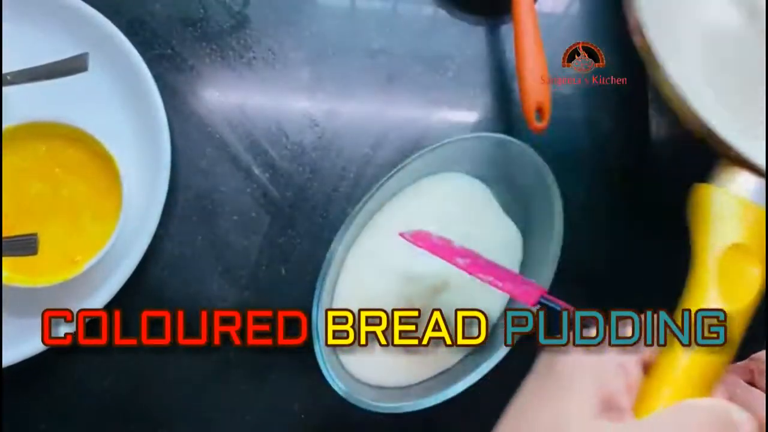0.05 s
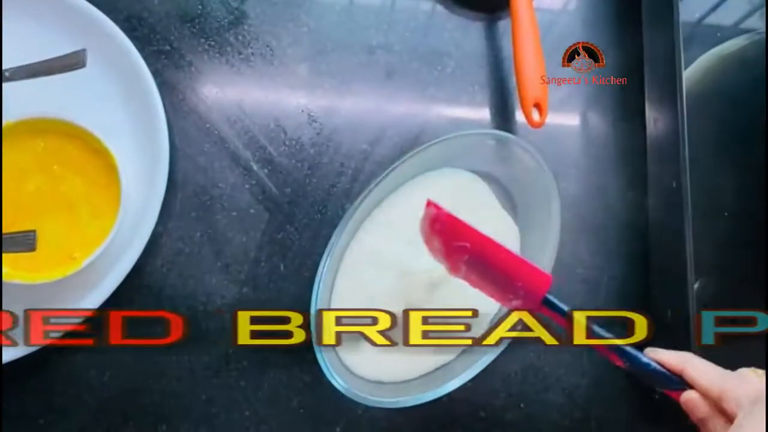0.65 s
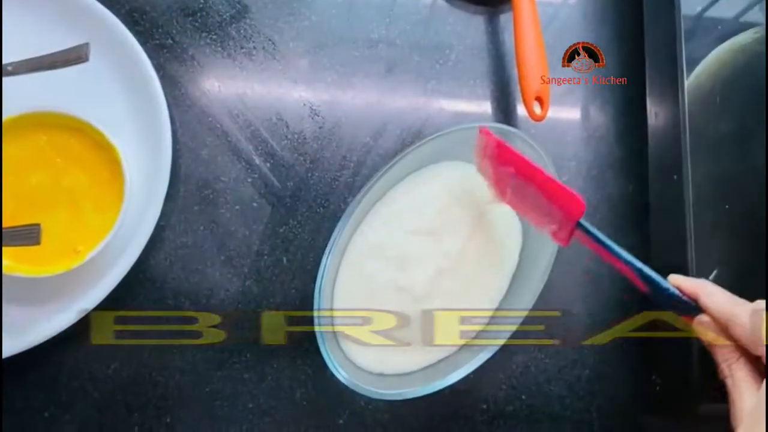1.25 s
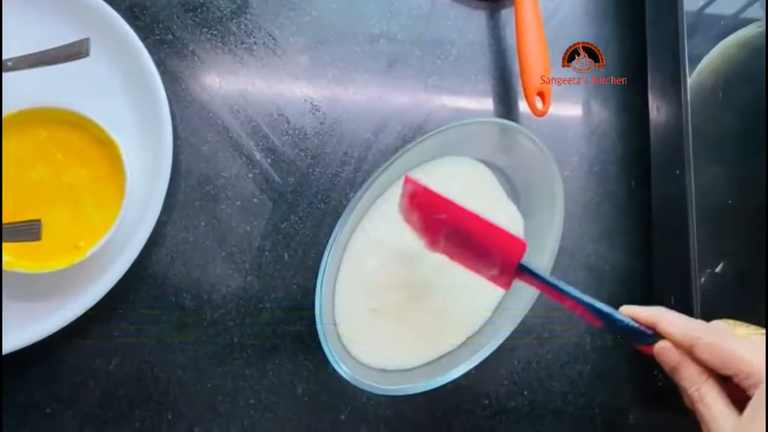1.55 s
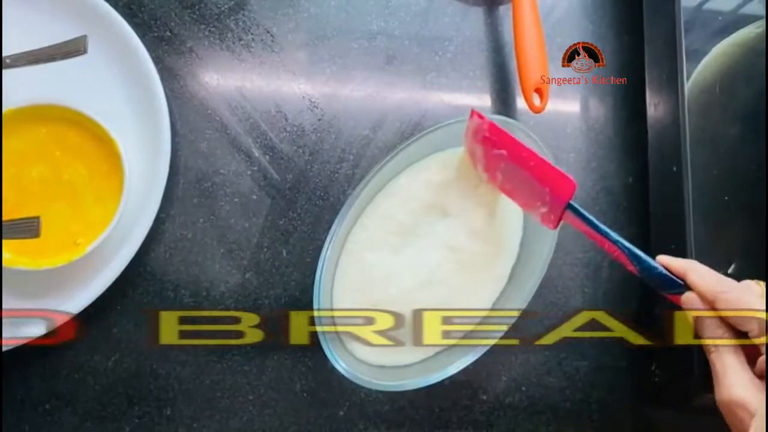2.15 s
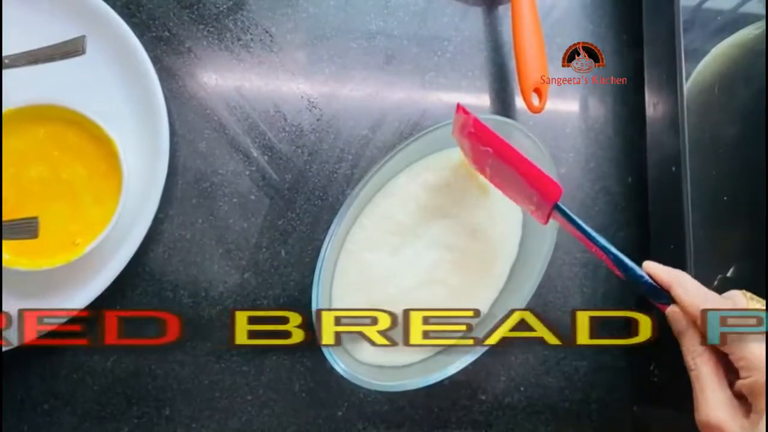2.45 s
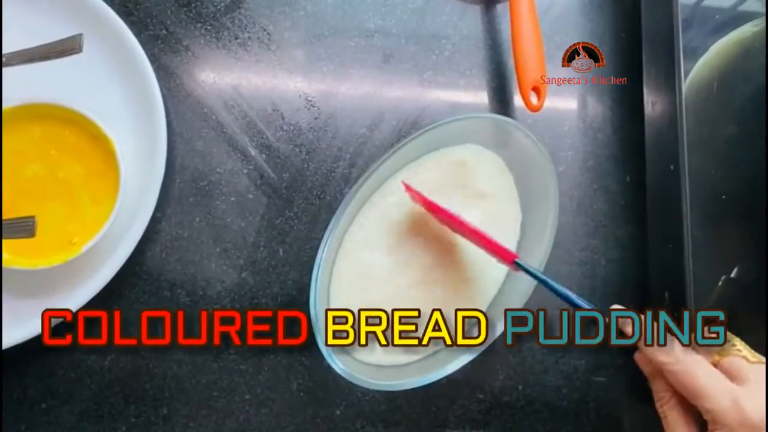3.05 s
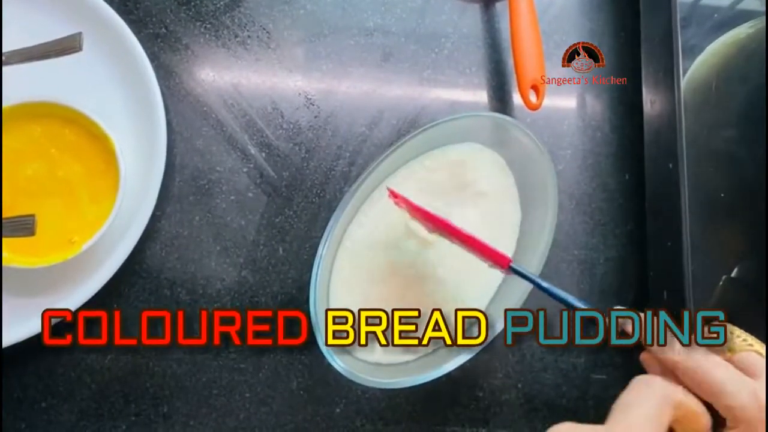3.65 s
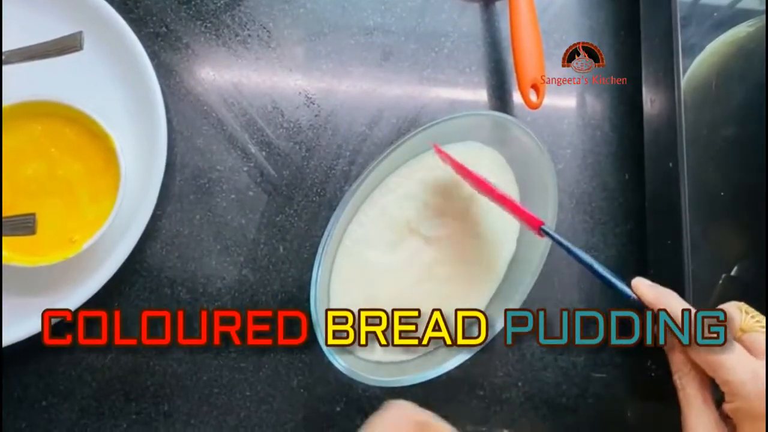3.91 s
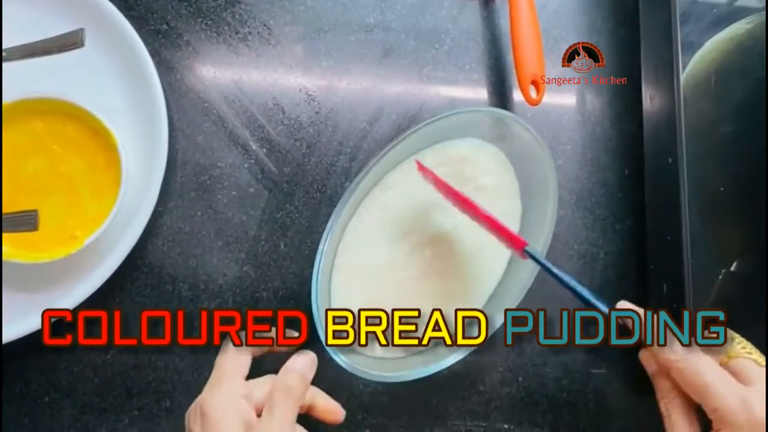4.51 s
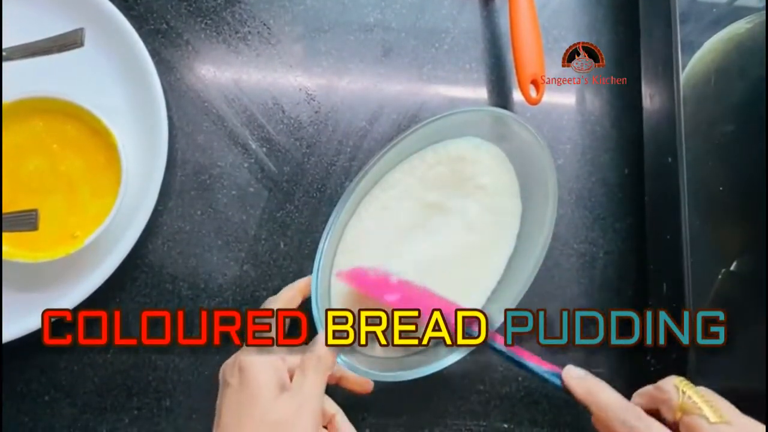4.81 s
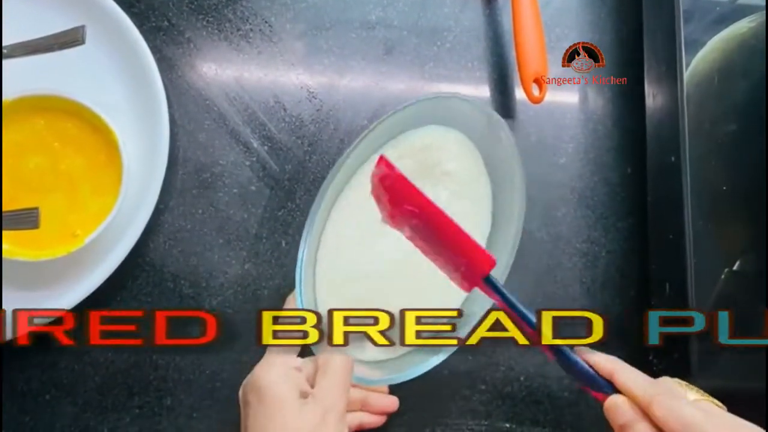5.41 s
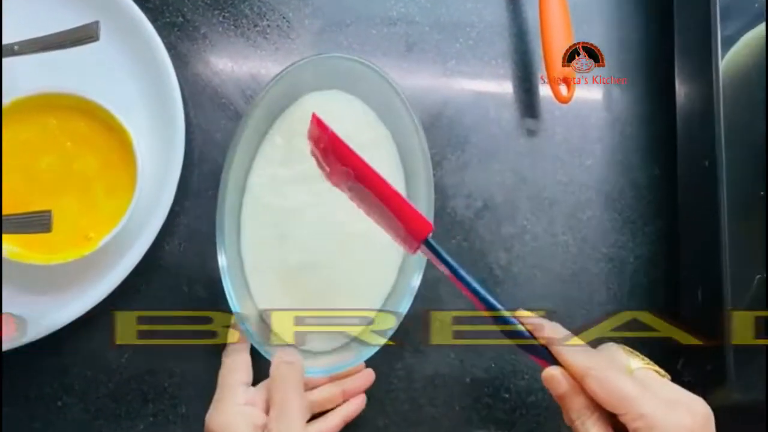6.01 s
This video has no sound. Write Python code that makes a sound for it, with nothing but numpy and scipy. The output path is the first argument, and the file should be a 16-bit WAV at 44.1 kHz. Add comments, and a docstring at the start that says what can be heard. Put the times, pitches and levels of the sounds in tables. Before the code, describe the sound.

Over a low kitchen hum, a pan knocks and rattles to rest, and a glass dish slides grittily and drops with a knock.

```python
"""Pan and custard dish in a small kitchen

Over a low machine hum, an emptied pan is knocked about and set down to one side: it clatters, thuds and
sings. A hiss surges briefly and a deeper drone stays on. A silicone spatula swishes almost silently
through custard in a glass baking dish. The dish is turned, sticks and slips over the worktop with a
gritty scrape and squeaks, drops back with a knock, and is ticked three times on the rim."""
import sys
import numpy as np
from scipy import signal
from scipy.fft import rfft, irfft
from scipy.io import wavfile
from scipy.ndimage import uniform_filter1d

SR = 44100
rng = np.random.default_rng(int(sys.argv[2]) if len(sys.argv) > 2 else 0)


def unload_wav(signal):
    """Save mono or channel-first audio to the path in sys.argv[1] as 16-bit WAV at rate SR, clipped to [-1, 1]."""
    wavfile.write(
        sys.argv[1],
        SR,
        np.round(np.clip(np.atleast_2d(signal).T, -1, 1) * 32767).astype(np.int16),
    )


N = 276507
TIME = np.arange(N) / SR
FREQS = np.fft.rfftfreq(N, 1 / SR)
BLOW_S = .75  # length of one blow's sound
BLOW_TIME = TIME[:int(BLOW_S * SR)]

# dull thud of the pan on its support: f/Hz, level/dB, t60/s
THUD_MODES = [(193, -6.5, 0.31), (246.2, -1, 0.21), (280.2, 5.5, 0.097), (346.4, -8.5, 0.11),
              (410.7, -5.5, 0.26), (461, -4.5, 0.1), (740, -11, 0.15)]
# the worktop's own boom: f/Hz, level/dB, t60/s
WORKTOP_MODES = [(76.2, -5.5, 0.6), (148.7, -12, 0.33), (237, -21, 0.79)]
# the pan's countless faint upper modes: f/Hz, level/dB
SHIMMER_COLOUR = [(1200, -7), (2000, 9), (2600, 9), (3200, 3), (3700, 1), (4400, -10), (6000, 11),
                  (8300, -21), (10200, 2), (12000, -18)]
# the filled glass dish, damped by the worktop: f/Hz, level/dB, t60/s
DISH_MODES = [(336, -12, 0.2), (661, -17, 0.23), (786, -6, 0.15), (881, -0.5, 0.15), (1160, -5, 0.2),
              (1270, -3.5, 0.11), (1364, -1.5, 0.17), (1510, -1.5, 0.2), (1540, 2, 0.07),
              (1730, -18, 0.097), (2070, -13, 0.06), (2350, -7.5, 0.08), (3380, -20, 0.055),
              (3920, -10, 0.082)]


def undb(db):
    """Decibels to gain."""
    return 10 ** (np.asarray(db) / 20)


def unit(x):
    """Scale to rms 1."""
    return x / np.sqrt(np.mean(x ** 2))


def across(points, hz=FREQS):
    """Read (f/Hz, value) points on a log-frequency axis."""
    f, value = np.transpose(points)
    return np.interp(np.log(np.maximum(hz, 1)), np.log(f), value)


def noise(gain):
    """Stereo noise of rms 1 with a gain per frequency; the bass is alike left and right."""
    # stereo width: f/Hz, side minus mid/dB
    width = [(40, -47), (100, -21.5), (160, -17.5), (280, -8.5), (500, 2), (1000, -0.5), (6000, -3.5),
             (10000, -0.5)]
    mid, side = rfft(rng.standard_normal((2, N))) * gain
    side = side * undb(across(width))
    return unit(irfft(np.array([mid + side, mid - side]), N))


def coloured(colour):
    """Stereo noise shaped by (f/Hz, level/dB) points."""
    return noise(undb(across(colour)))


def walk(rate_hz):
    """A smooth random wobble of rms 1."""
    step = int(SR / rate_hz)
    stairs = np.repeat(rng.standard_normal(N // step + 1), step)
    return unit(uniform_filter1d(stairs, step)[:N])


def swell(s, rise_s, hold_s, fall_s):
    """Gain that reaches 1 at time s, holds and dies away; it changes tenfold in rise_s and in fall_s."""
    return 10 ** -(np.maximum(s - TIME, 0) / rise_s + np.maximum(TIME - s - hold_s, 0) / fall_s)


def pushes(rows):
    """Bell-shaped gains of movements that speed up and slow down, from (t/s, length/s, level/dB) rows."""
    return sum(undb(db) * np.exp(-(2 * (TIME - s) / length) ** 2) for s, length, db in rows)


def ring(modes, detune=0.0094):
    """Decaying modes after one blow, each slightly detuned at random, fading smoothly to silence."""
    t, out = BLOW_TIME, 0
    for hz, db, t60 in modes:
        phase = 2 * np.pi * hz * (1 + detune * rng.standard_normal()) * t
        out = out + undb(db - 60 * t / t60) * np.sin(phase)
    return np.array([out, out]) * (1 - (t / BLOW_S) ** 4)


def burst(source, t60):
    """A short random stretch of noise that dies away: countless dense modes."""
    start = rng.integers(N - len(BLOW_TIME))
    return source[:, start:start + len(BLOW_TIME)] * undb(-60 * BLOW_TIME / t60)


def spread(x, rise_s):
    """Vibration takes a moment to fill the whole object."""
    return x * (1 - np.exp(-TIME[:x.shape[1]] / rise_s))


def soften(x, hz):
    """A softer contact loses its treble."""
    return signal.sosfilt(signal.butter(2, hz, fs=SR, output="sos"), x)


def add(track, s, sound):
    """Mix a sound in at time s."""
    start = int(s * SR)
    track[:, start:start + sound.shape[1]] += sound[:, :N - start]


def balance(x, left_db):
    """Make the left channel left_db louder than the right."""
    return x * undb(np.array([[1], [-1]]) * left_db / 2)


def place(x, lead_s):
    """Off to one side: the sound reaches the left channel lead_s sooner."""
    return irfft(rfft(x) * np.exp(1j * np.pi * FREQS * lead_s * np.array([[1], [-1]])), N)


def drone_on(full_s=3.45, rise_s=0.16):
    """Gain of the drone: it rises quickly and stays."""
    return 10 ** (np.minimum(TIME - full_s, 0) / rise_s)


def hum(hum_db=-55, drone_db=-47, waver_db=-0.31):
    """Steady machine hum and the later, deeper drone, both coloured by the same resonances."""
    # broad tone of the hum and of the drone: f/Hz, level/dB
    hum_colour = [(20, -32), (35, -4), (55, -4.5), (80, -6), (150, -1.5), (300, -2.5), (450, -14),
                  (700, -18.5), (1000, -24), (1300, -28), (1800, -38), (3000, -47.5), (7000, -46),
                  (14000, -88)]
    drone_colour = [(20, -25), (35, -2), (70, 0), (150, 2), (290, -0.5), (500, -12), (750, -17.5),
                    (1000, -19.5), (1400, -27), (1750, -36), (2600, -38.5), (4000, -46.5), (7000, -43.5),
                    (14000, -102)]
    # resonances that stand out of both: f/Hz, width/Hz, boost/dB
    resonances = [(47.4, 20, 11), (100.3, 5.2, 14.5), (144.6, 22.3, 12.5), (232.4, 28, 4), (284.6, 44, 6.5),
                  (330.8, 15, 6), (398.5, 17.7, 8), (488, 16.4, 10), (701, 56, 11)]
    peaks_db = sum(db / (1 + ((FREQS - hz) / width * 2) ** 2) for hz, width, db in resonances)
    steady = noise(undb(across(hum_colour) + peaks_db)) * undb(hum_db)
    drone = noise(undb(across(drone_colour) + peaks_db)) * undb(drone_db) * drone_on()
    return balance((steady + drone) * undb(waver_db * walk(4.0)), left_db=0.21)


def hiss(floor_db=-86, with_drone_db=-86, with_drag_db=-72, flutter_db=1.4):
    """A broad hiss that comes in surges; a little stays with the drone and follows the sliding dish."""
    # surges: t at full strength/s, level/dB, rise/s, hold/s, fall/s
    surges = [(0, -74.5, .1, 0.015, 0.46), (2.83, -68.5, 0.38, 0.046, 0.21),
              (3.432, -57, 0.071, 0.21, 0.35), (4.84, -76.5, 0.32, 0.07, 0.15), (6.084, -71, 1, 0.08, 0.28)]
    # tone of the hiss: f/Hz, level/dB
    colour = [(400, 10), (800, 4), (1200, 9), (1600, 6.5), (3000, 3.5), (5000, 2.5), (7000, -2),
              (11300, -2.5), (12200, -17.5), (16000, -33)]
    parts = [undb(db) * swell(s, rise_s, hold_s, fall_s) for s, db, rise_s, hold_s, fall_s in surges]
    parts += [undb(floor_db), undb(with_drone_db) * drone_on(), undb(with_drag_db) * drag_swell()]
    strength = np.sqrt(sum(part ** 2 for part in parts))
    return balance(coloured(colour) * strength * undb(flutter_db * walk(60)), left_db=-1.3)


def spatula(stick_db=2.5):
    """Wet silicone swishes faintly against the glass as each stroke swells and ends."""
    # soft strokes through the custard: t/s, length/s, level/dB
    strokes = [(0.077, 0.17, -76.5), (0.43, 0.44, -80.5), (1.66, 0.26, -74.5), (2.53, 0.06, -84),
               (2.843, 0.059, -63), (4.56, 0.23, -71.5)]
    # the swish takes on the resonances of the dish: f/Hz, level/dB
    colour = [(600, -4.5), (1220, 7), (1520, 2.5), (1800, -1), (2080, -5), (2450, -0.5), (3000, -7.5),
              (3800, -7), (5000, -14), (9000, -26)]
    return coloured(colour) * undb(stick_db * walk(60)) * pushes(strokes)


def pan_singing(s, shimmer, shimmer_db=-27.5, free_until_s=1.3, support_t60=1.7):
    """A rough metal ring: wavering modes over a shimmer, damped by the support once the pan rests."""
    # the pan's metal: f/Hz, level/dB, t60/s, waver width/Hz
    metal_modes = [(889, -2.5, 0.15, 15), (1208, -5.5, 0.66, 25), (1976, -1, 0.098, 29),
                   (1970, -21, 4.7, 25), (2907, -23, 2.7, 45), (3270, -22, 2.4, 35),
                   (4360, -20.5, 0.71, 170), (5270, -17.5, 0.46, 54), (5900, -28, 0.6, 70),
                   (6530, -22.5, 0.7, 72), (7770, -22, 0.49, 93), (10700, -26.5, 0.073, 100)]
    t, resting = BLOW_TIME, s > free_until_s
    out = undb(shimmer_db) * burst(shimmer, t60=0.2 if resting else 1.6)
    for hz, db, t60, width_hz in metal_modes:
        damping = 1 / t60 + resting * hz / 1000 / support_t60  # support_t60 at 1 kHz, shorter higher up
        waver = np.cumsum(rng.standard_normal((2, len(t))), axis=1) * np.sqrt(2 * np.pi * width_hz / SR)
        out = out + undb(db - 60 * t * damping) * np.sin(2 * np.pi * hz * t + waver)
    return spread(out, rise_s=0.00068)


def pan_blows(chatter_db=3.5, landed_s=3.6):
    """Each contact chatters, rings the pan's body, thuds, shakes the worktop and sets the metal singing."""
    # contacts with the support: t/s, clatter/dB, clatter t60/s, brightness/Hz,
    # body/dB, thud/dB, worktop boom/dB, metal ring/dB
    blows = [(.886, -59, 0.078, 786, -54, -40, -54, -54.5), (.895, -43.5, 0.12, 700, -51, -48, -45, -67),
             (1.3432, -43.5, 0.15, 2750, -45, -53, -50, -53.5),
             (1.352, -37, 0.09, 1260, -40.5, -51.5, -53, -68),
             (2.9627, -35, 0.1, 1000, -51, -40, -48, -54.5), (2.97, -44, 0.13, 3400, -52, -39, -42, -60),
             (2.979, -41.5, 0.073, 3580, -40.5, -42.5, -43, -67),
             (3.0, -40, 0.14, 1400, -46, -41.5, -53, -60), (3.032, -37.5, 0.09, 2820, -39, -44, -50, -55),
             (3.041, -40.5, 0.08, 1500, -39, -46, -59, -68),
             (3.051, -32.5, 0.18, 1300, -44, -39.5, -42, -51),
             (3.059, -41, 0.11, 2800, -41.5, -42.5, -45, -56),
             (3.076, -37.5, 0.1, 1490, -47, -48, -52, -65), (3.44, -52, 0.14, 2000, -56, -44.5, -53, -66),
             (3.466, -46.5, 0.089, 3780, -56, -39, -39.5, -53),
             (3.667, -48, 0.098, 900, -66, -47, -50, -69),
             (3.686, -47, 0.087, 2600, -51.5, -42, -37.5, -59),
             (3.864, -49, 0.079, 2410, -59, -43, -42, -62),
             (3.873, -48, 0.11, 1300, -71, -43.5, -41.5, -71)]
    # tone of the clatter: f/Hz, level/dB
    clatter_colour = [(150, -54), (300, -4), (570, -2.5), (980, 3), (1450, 1), (1800, -4.5), (2250, -4.5),
                      (2700, -7.5), (3300, -5.5), (4000, -14.5), (5500, -12), (7300, -28), (11000, -49),
                      (15000, -69)]
    # body and handle, quickly damped: f/Hz, level/dB, t60/s
    body_modes = [(728, -5.5, 0.13), (827, -2.5, 0.11), (918, -1, 0.1), (976, -6.5, 0.14),
                  (1244.3, -13, 0.4), (1370, -14, 0.41), (1410, -14.5, 0.21), (1522, -16, 0.18),
                  (1947, -15, 0.15), (2270, -5, 0.066), (2974, -10, 0.11), (3270, -10.5, 0.078),
                  (4339, -14, 0.09)]
    # the base, which rings on once the pan is down flat: f/Hz, level/dB, t60/s
    base_modes = [(1192, -18, 0.41), (1250, -18, 0.18), (1325, -16, 0.18)]
    out, shimmer = np.zeros((2, N)), coloured(SHIMMER_COLOUR)
    chatter = undb(chatter_db * walk(600))
    clatter = unit(coloured(clatter_colour) * chatter)
    for s, clatter_db, clatter_t60, contact_hz, body_db, thud_db, boom_db, ring_db in blows:
        body = undb(body_db) * ring(body_modes, detune=0.0039)
        thud = undb(thud_db) * ring(THUD_MODES, detune=0.0405)
        boom = undb(boom_db) * ring(WORKTOP_MODES)
        clank = undb(clatter_db) * burst(clatter, clatter_t60) + spread(body + thud + boom, rise_s=0.0017)
        add(out, s, soften(clank, contact_hz) + undb(ring_db) * pan_singing(s, shimmer))
        if s > landed_s:
            add(out, s, undb(boom_db) * spread(ring(base_modes), rise_s=0.0068))
    return place(out, lead_s=-0.000024)


def pan_grazes(clink_db=7.5, thud_db=6, clink_above_hz=1750):
    """Glancing touches: a faint, short rasp with a soft thud; only the metal's upper modes clink."""
    # the base brushes its support: t/s, level/dB
    grazes = [(2.147, -69.5), (2.354, -77.5), (2.418, -82)]
    out, shimmer = np.zeros((2, N)), coloured(SHIMMER_COLOUR)
    treble = signal.butter(3, clink_above_hz, "high", fs=SR, output="sos")
    for s, db in grazes:
        clink = undb(clink_db) * signal.sosfilt(treble, pan_singing(s, shimmer))
        rasp = burst(shimmer, t60=0.043)
        thud = undb(thud_db) * spread(ring(THUD_MODES, detune=0.028), rise_s=.002)
        add(out, s, undb(db) * (rasp + clink + thud))
    return out


def worktop_shudder(hz=77, width_hz=22):
    """Rubbing keeps the worktop's lowest mode trembling."""
    # shoves on the worktop: t at the middle/s, length/s, level/dB
    shoves = [(3.05, 0.27, -46.5), (3.32, 0.081, -48.5), (3.47, 0.19, -43.5), (3.77, 0.25, -45.5),
              (3.97, 0.15, -42), (4.13, 0.23, -46)]
    resonance = np.minimum(FREQS / hz, 1) / (1 + ((FREQS - hz) / width_hz * 2) ** 2)
    return noise(resonance) * pushes(shoves)


def drag_swell(rise_s=0.16):
    """Gain of the slide: the dish gathers speed, glides for a moment and slows just before it catches."""
    return swell(5.66, rise_s, hold_s=0.076, fall_s=0.17)


def grit(level_db=-59.5, grain_db=3):
    """Fine crumbs crunch under the glass, swelling slowly as the dish gets moving."""
    # tone of the crunch: f/Hz, level/dB
    colour = [(500, -6), (900, 3), (1400, 5.5), (1900, 0), (2600, -1.5), (3300, -7.5), (5000, -12),
              (8000, -23.5), (11000, -23), (14000, -47)]
    grains = unit(coloured(colour) * undb(grain_db * walk(540)))
    return undb(level_db) * grains * drag_swell(rise_s=0.42)


def dish_drag(level_db=-49, slips_per_s=700, scatter_db=3, groan_db=-1, rough_db=2, contact_hz=2100):
    """The glass foot sticks and slips: slips ring the dish, and the contact groans on unsteady tones."""
    # tones of the groan: f/Hz, wander/Hz, level/dB
    groan_tones = [(848, 70, -13), (1267, 113, -7), (1480, 136, -3), (1770, 150, -10)]
    slips = (rng.random(N) < slips_per_s / SR) * rng.choice([-1, 1], N)
    slips = slips * undb(scatter_db * rng.standard_normal(N))
    glass = unit(signal.fftconvolve(slips[None], ring(DISH_MODES), axes=1)[:, :N])
    groan = 0
    for hz, wander_hz, db in groan_tones:
        pitch = hz + wander_hz * walk(250)
        judder = undb(3 * walk(110))
        groan = groan + undb(db) * judder * np.sin(2 * np.pi * np.cumsum(pitch) / SR)
    scrape = unit(soften(glass + undb(groan_db) * unit(groan), contact_hz))
    strength = undb(level_db + rough_db * walk(70)) * drag_swell()
    return place(scrape * strength + squeaks() + grit(), lead_s=.00007)


def squeaks(glide_hz_per_s=1900, wander_hz=70, rough_db=3):
    """For moments the slips lock into a rough, rising tone."""
    # the dish's foot catches: t/s, length/s, level/dB, f/Hz
    catches = [(5.612, 0.018, -48, 700), (5.655, 0.03, -47, 1282), (5.684, 0.029, -42, 880),
               (5.747, 0.0087, -35.5, 903)]
    out, waver = 0, wander_hz * walk(500)
    for s, length, db, hz in catches:
        pitch = hz + glide_hz_per_s * np.clip(TIME - s, -length, length) + waver
        out = out + np.sin(2 * np.pi * np.cumsum(pitch) / SR) * pushes([(s, length, db)])
    return out * unit(undb(rough_db * walk(400)))


def dish_knocks(crack_db=3, tail_db=-17, glass_db=-10, contact_hz=4200):
    """The dish drops back in a quick rattle: a crack, a dense tail, ringing glass and a worktop boom."""
    # knocks on the worktop: t/s, level/dB, worktop boom/dB
    knocks = [(5.7494, -27, -38), (5.7511, -24, -50), (5.7593, -32.5, -28.5), (5.762, -38, -24.5)]
    # tone of the crack and its tail: f/Hz, level/dB
    crack_colour = [(200, 1.5), (350, -3.5), (550, -13.5), (880, -3.5), (1100, -3), (1500, -0.5),
                    (1850, -10), (2300, -11.5), (2650, -19), (3200, -15), (3900, -24), (4800, -37),
                    (7000, -50), (15000, -88)]
    out, dense = np.zeros((2, N)), coloured(crack_colour)
    for s, db, boom_db in knocks:
        crack = undb(crack_db) * burst(dense, t60=0.031)
        tail = undb(tail_db) * burst(dense, t60=0.3)
        glass = undb(glass_db) * spread(ring(DISH_MODES, detune=0.0025), rise_s=0.0015)
        add(out, s, undb(db) * (crack + tail + glass))
        add(out, s, undb(boom_db) * spread(ring(WORKTOP_MODES), rise_s=0.0036))
    return place(soften(out, contact_hz), lead_s=-0.000036)


def rim_ticks(glass_db=-7):
    """Light, hard touches wake only the highest modes of the glass."""
    # touches on the rim: t/s, level/dB, brightness/Hz
    ticks = [(5.868, -51.5, 11900), (6.034, -55, 11400), (6.159, -51.5, 5340)]
    # the glass rim: f/Hz, level/dB, t60/s
    rim_modes = [(5040, -16, 0.065), (6000, -9, 0.097), (6500, -5, 0.082), (7600, -8, 0.069),
                 (10700, 4.5, 0.067), (11600, -5, 0.034), (14700, -5, .04)]
    # bright, thin treble tick of a light touch on glass: f/Hz, level/dB
    thin_treble = [(2000, -48), (5500, 12), (9000, -7), (10800, 16), (12500, -30), (14700, -9)]
    out, treble = np.zeros((2, N)), coloured(thin_treble)
    for s, db, contact_hz in ticks:
        glass = undb(glass_db) * ring(rim_modes, detune=0.0098)
        add(out, s, undb(db) * soften(glass + burst(treble, t60=0.037), contact_hz))
    return out


def kitchen(x, wet_db, build_s=0.0042):
    """Hard walls: dense echoes that build up quickly and die soonest in the treble."""
    # pan and dish stand a little to the right, so their direct sound leans: f/Hz, left minus right/dB
    lean = [(200, 0), (500, -4), (900, -3), (1400, 2.5), (2100, -7), (3200, -1.5), (6000, -6.5),
            (10000, -3)]
    # the room's decay: f/Hz, t60/s
    decay = [(100, 0.74), (400, 0.54), (1300, 0.5), (3000, 0.44), (10000, 0.22)]
    echo_colour = [(60, -7), (250, -1.5), (700, -3.5), (3000, -2.5), (12000, 4.5)]
    t, echoes = TIME[:SR], 0
    spectrum = rfft(coloured(echo_colour)[:, :SR])
    octave = np.log2(np.maximum(np.fft.rfftfreq(SR, 1 / SR), 1))
    for k in range(5, 15):
        band = irfft(spectrum * np.maximum(1 - abs(octave - k), 0), SR)
        echoes = echoes + band * undb(-60 * t / across(decay, 2 ** k))
    echoes = unit(echoes * (1 - np.exp(-t / build_s))) / np.sqrt(SR)
    direct = irfft(balance(rfft(x), across(lean)), N)
    return direct + undb(wet_db) * signal.fftconvolve(x, echoes, axes=1)[:, :N]


def scene():
    """Pan and dish sound in the room over hiss and hum; the ticks are close and drier."""
    cookware = pan_blows() + pan_grazes() + dish_knocks() + dish_drag()
    in_room = kitchen(cookware, wet_db=-4) + kitchen(rim_ticks(), wet_db=-13)
    return in_room + spatula() + hiss() + worktop_shudder() + hum()


def record(dry, bottom_hz=38, top_hz=15400):
    """The microphone drops the deepest bass and cuts the top."""
    low_cut = signal.butter(4, bottom_hz, "high", fs=SR, output="sos")
    high_cut = signal.ellip(8, .2, 70, top_hz, fs=SR, output="sos")
    return signal.sosfilt(high_cut, signal.sosfilt(low_cut, dry))


dry = scene()
out = record(dry)
unload_wav(out)
```